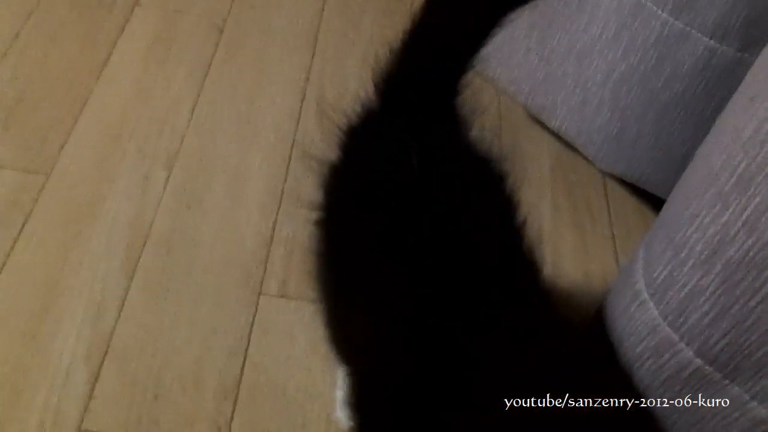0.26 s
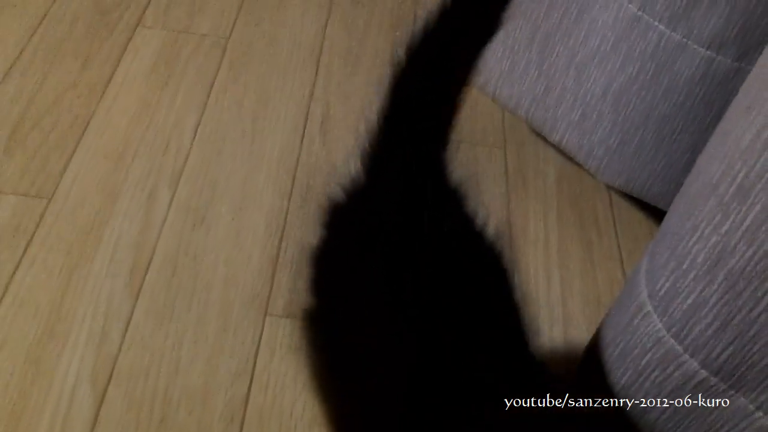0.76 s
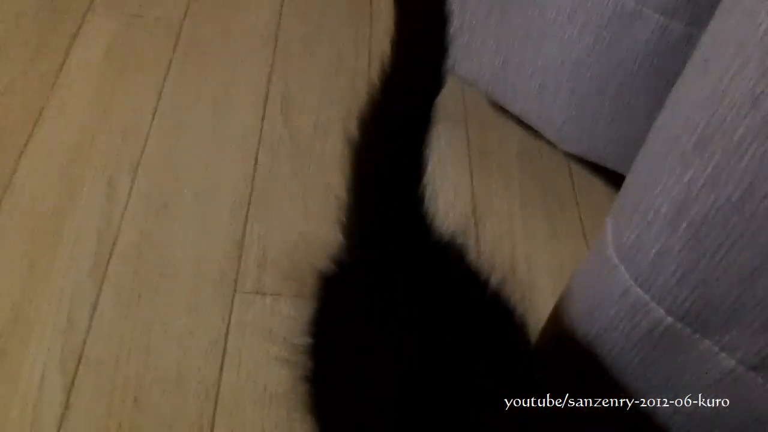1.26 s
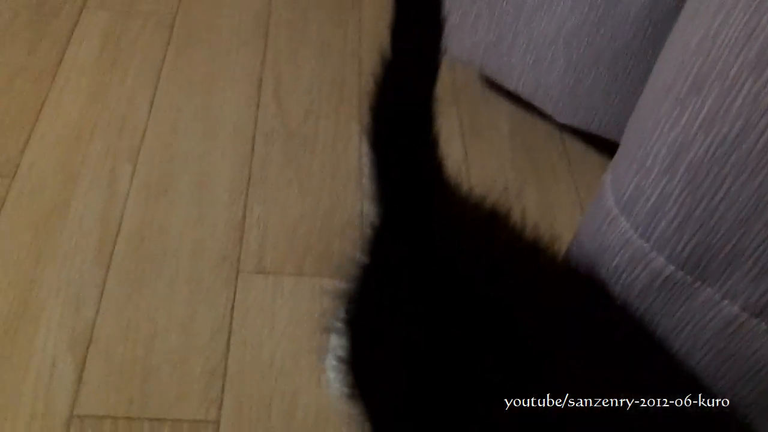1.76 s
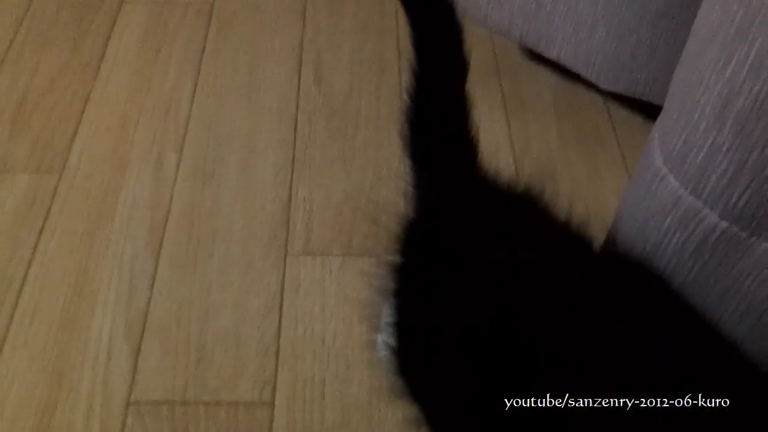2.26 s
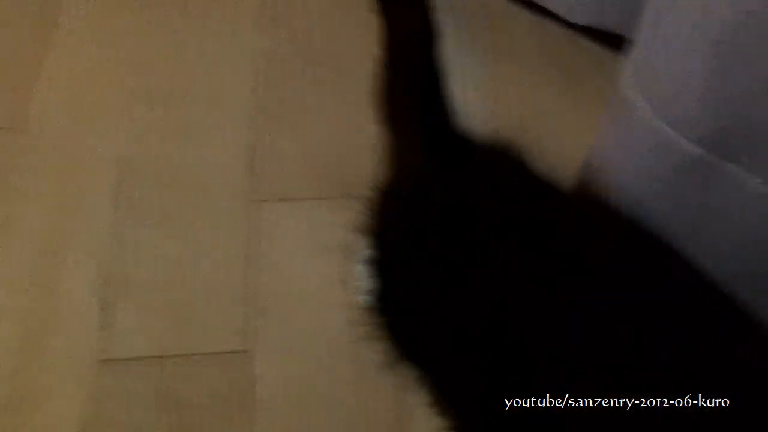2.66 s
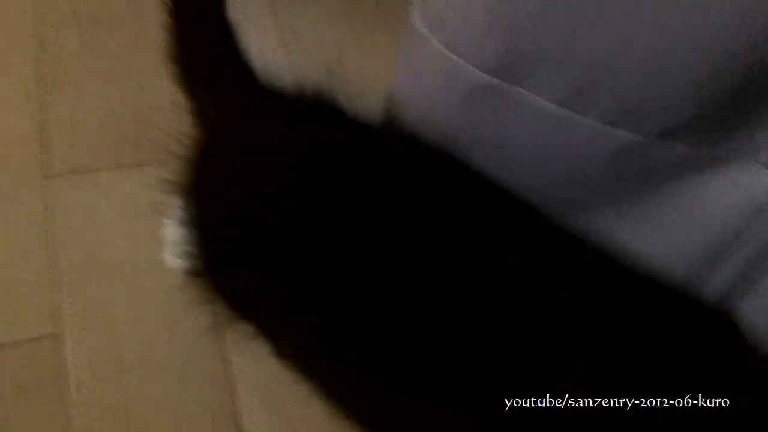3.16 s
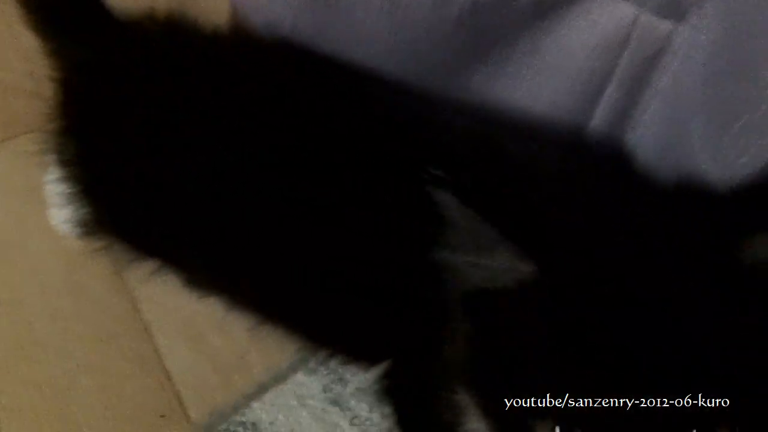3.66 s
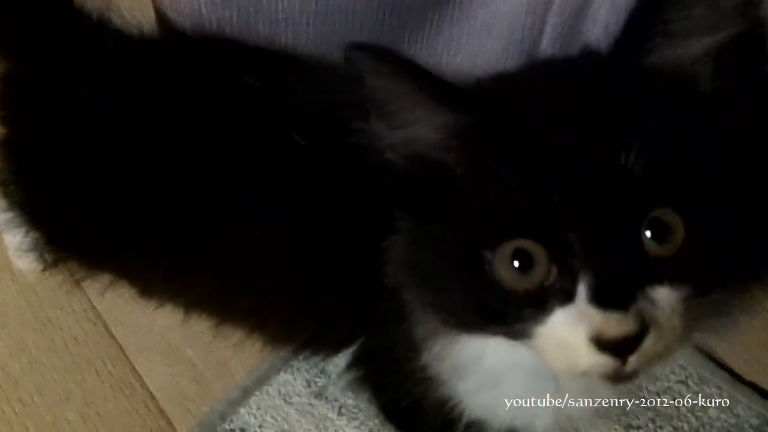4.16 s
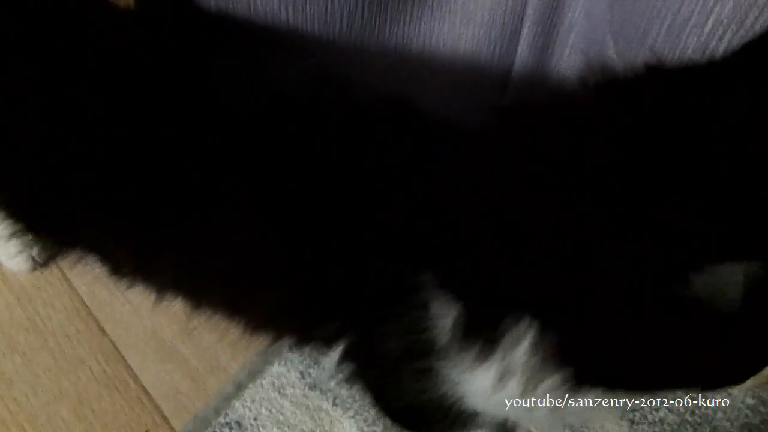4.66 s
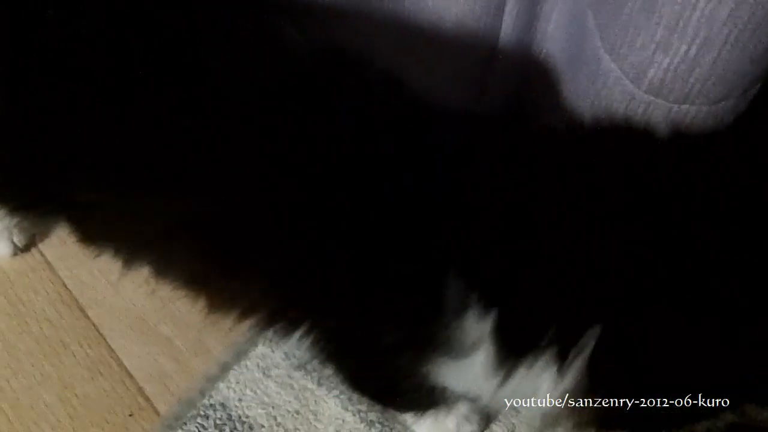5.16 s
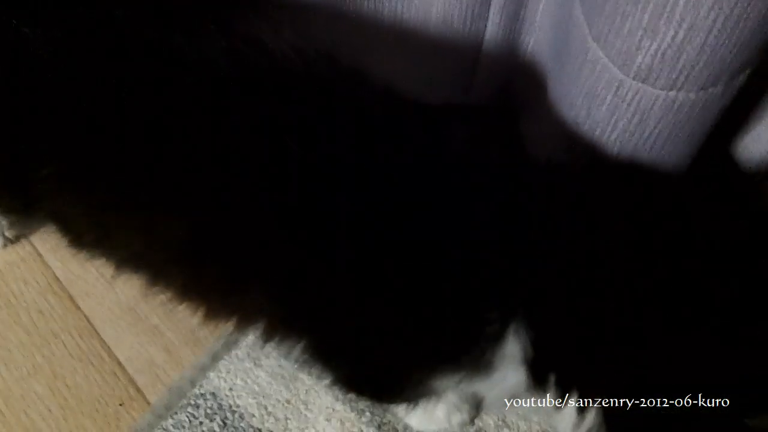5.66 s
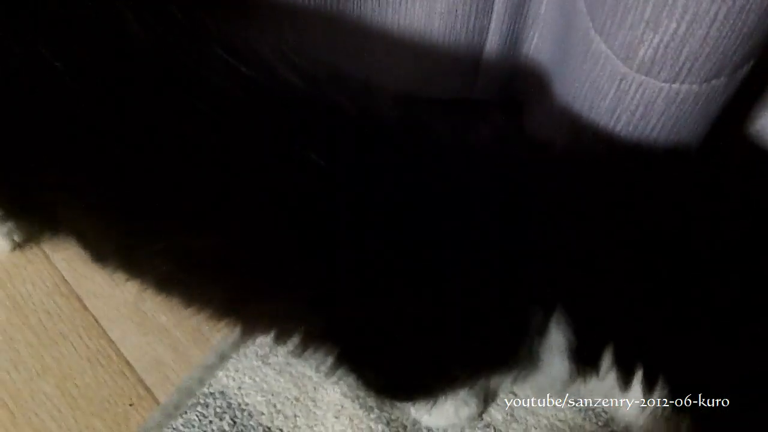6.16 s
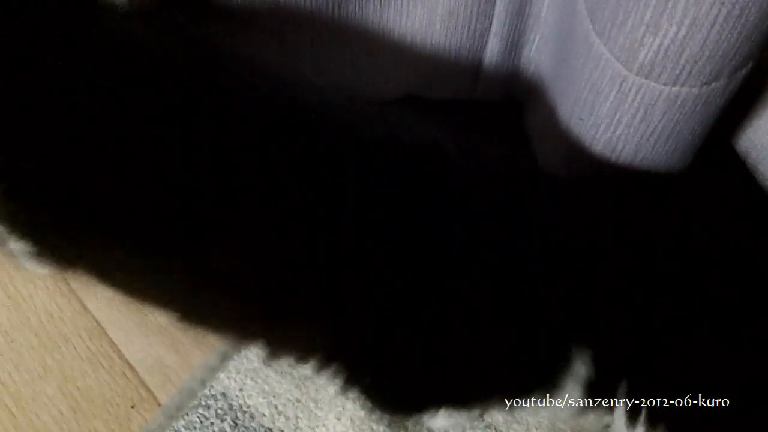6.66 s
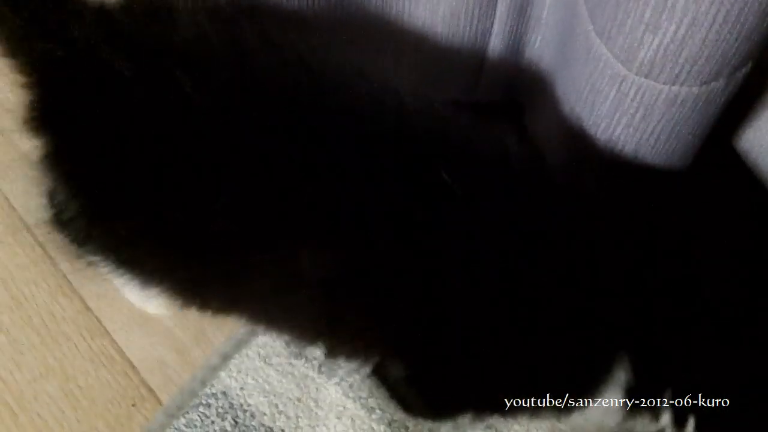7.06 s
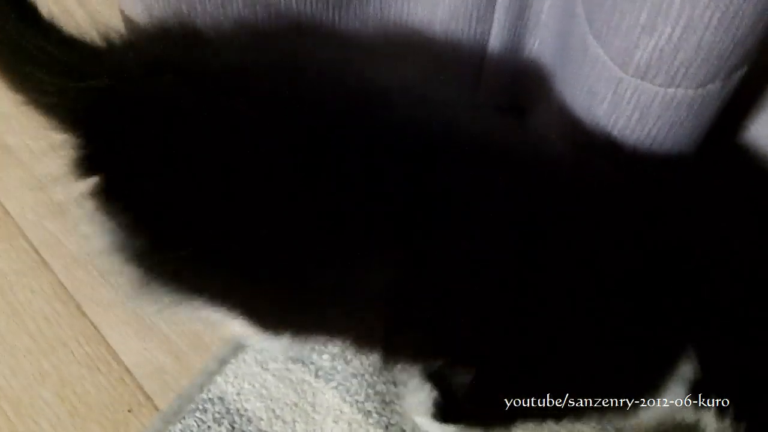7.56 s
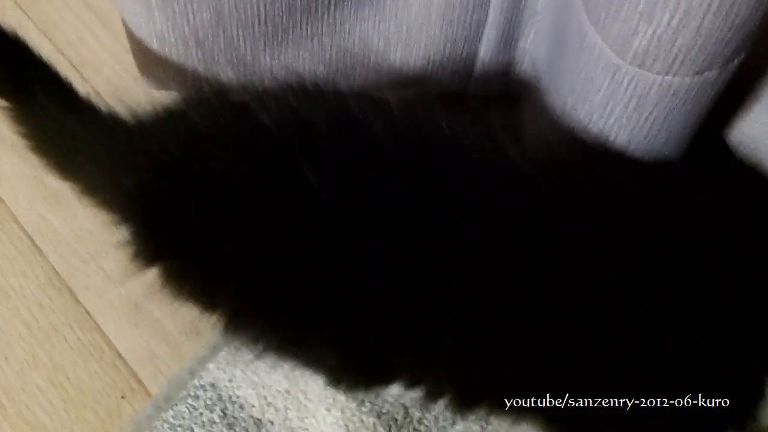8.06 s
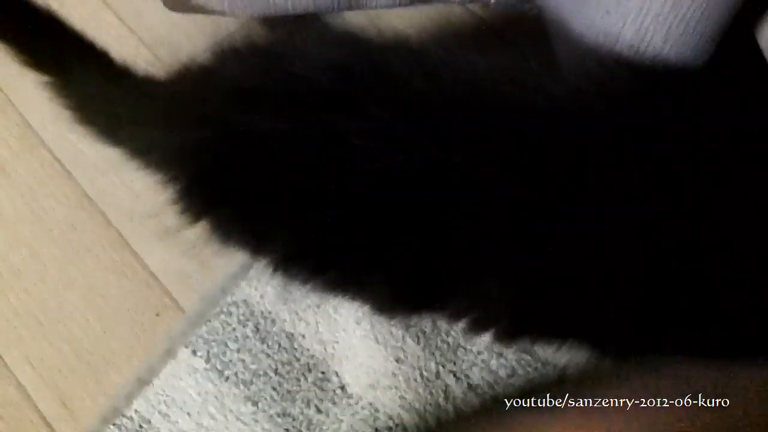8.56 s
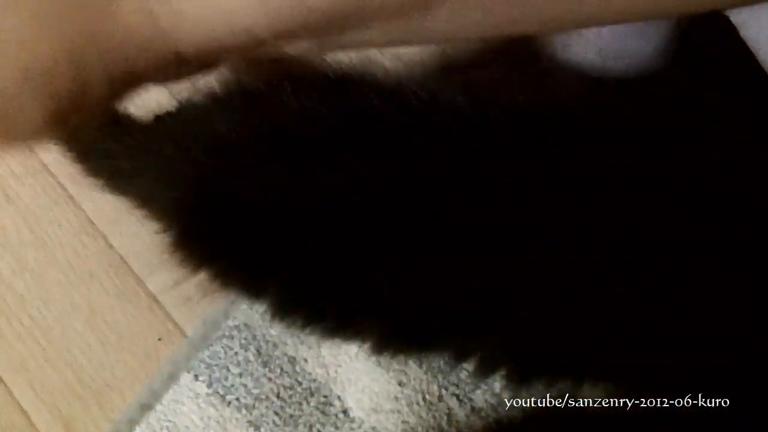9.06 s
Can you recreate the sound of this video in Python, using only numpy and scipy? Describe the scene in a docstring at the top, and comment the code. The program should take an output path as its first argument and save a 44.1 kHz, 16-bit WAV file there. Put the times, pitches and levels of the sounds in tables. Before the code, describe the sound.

Close, dry plastic clicks, short scrapes and dull handling bumps cluster then thin out over microphone hiss, low hum and very soft fur brushing.

```python
"""Over microphone hiss and a low wavering hum, fingers tick and slide on a plastic camera case and
the grip bumps it; fur rustles faintly on cloth and the holding hand rumbles. Ticks are blows with
chatter and slides are slipping noise, both rung through the case and its air pocket; bumps and two slow
low swings are smooth pulses with a hollow knock; fur, hum, hiss and rumble are filtered noise."""
import sys
import numpy as np
from scipy import signal
from scipy.fft import rfft, irfft, next_fast_len
from scipy.io import wavfile
from scipy.ndimage import map_coordinates

SR = 44100
rng = np.random.default_rng(int(sys.argv[2]) if len(sys.argv) > 2 else 0)


def store_wav(level_fs):
    """Save 16-bit WAV to argv[1]."""
    pcm = np.round(np.clip(np.atleast_2d(level_fs), -1, 1) * 32767)
    wavfile.write(sys.argv[1], SR, pcm.T.astype(np.int16))


N = 410130

# ticks of the case: t/s (blow 0.7 ms later), nominal cavity peak/dB, walls re cavity/dB
TICK_ROWS = [(.3486, -20.5, -23), (1.4336, -33, -24), (1.6467, -33, -19), (1.66, -39, -19),
             (1.6751, -39, -21), (1.8106, -24.5, -17), (1.8982, -27.5, -8.5), (1.9128, -29, -22),
             (1.94, -29, -21), (1.9545, -25, -29), (2.0183, -20, -23), (2.153, -36, -16),
             (2.2014, -33, -24), (2.273, -24.5, -21), (2.607, -0.5, -24), (2.6156, -25, -6.5),
             (2.885, -35, -16), (2.9898, -29, -26), (3.0627, -3, -24), (3.076, -17, -27),
             (3.1562, -4.5, -24), (3.2085, -23, -14), (3.2496, -26, -7), (3.2674, -22.5, -27),
             (3.2836, -21, -19), (3.3022, -15, -33), (3.3199, -16, -19.5), (3.3347, -19, -25),
             (3.351, -21, -19.5), (3.3632, -17, -23), (3.3763, -19, -21), (3.3885, -22, -13.5),
             (3.6451, -13, -23), (3.65, -15, -30), (3.7618, -22, -13), (4.342, -33.5, -2.5),
             (4.9552, -40.5, -2), (5.338, -37, -5), (5.5008, -16, -14.5), (5.5077, -8.5, -31),
             (5.9049, -30.5, -24), (6.0464, -40, -16), (6.2203, -30.5, -20), (7.2093, 2, -29.5),
             (7.7817, -40, -12), (7.9127, -34, -16), (7.9693, -29, -4.5), (8.0786, -30, -6),
             (8.397, -30, -16), (8.4222, -20, -12), (8.4277, -12, -17), (8.4588, -22, -7)]


def amp(db):
    """Decibels to gain."""
    return 10 ** (np.asarray(db) / 20)


def unit(x):
    """Scaled to rms 1."""
    return x / np.sqrt(np.mean(x ** 2) + 1e-20)


def curve(rows):
    """One value per sample from (t/s, value) rows."""
    return np.interp(np.arange(N) / SR, *np.transpose(rows))


def wobble(knots_per_s):
    """A smooth curve through random knots."""
    knots = rng.standard_normal(int(N * knots_per_s / SR) + 4)
    return map_coordinates(knots, [np.arange(N) * knots_per_s / SR])


def filtered(x, response):
    """x times a complex response of frequency, zero-padded by at least half a second."""
    m = next_fast_len(N + SR // 2)
    spectrum = rfft(x, m) * response(np.fft.rfftfreq(m, 1 / SR))
    return irfft(spectrum, m)[..., :N]


def ringing(x, modes, order=1):
    """Causal resonances of alternating sign, raised to order (gains too); white noise keeps its rms."""
    def shape(f):
        total = 0
        for k, (centre, width, db) in enumerate(modes):
            resonance = 1j * f * width / (centre ** 2 - f * f + 1j * f * width)
            total = total + (-1) ** k * amp(db) * resonance
        return total ** order

    power = np.mean(np.abs(shape(np.arange(1, SR // 2))) ** 2)
    return filtered(x, shape) / np.sqrt(power)


def soft(x, edge_hz):
    """Soft skin passes little above the edge: two one-pole low-passes."""
    return filtered(x, lambda f: 1 / (1 + 1j * f / edge_hz) ** 2)


def swell(start_s, rise_s, hold_s, fall_s):
    """A smooth rise, a plateau and a smooth fall: (first sample, shape)."""
    t = np.arange(round((rise_s + hold_s + fall_s) * SR) + 2) / SR
    edge = np.clip(np.minimum(t / (rise_s + 1e-4), (t[-1] - t) / (fall_s + 1e-4)), 0, 1)
    return round(start_s * SR), np.sin(np.pi / 2 * edge) ** 2


def hiss():
    """Nearly steady room air and microphone noise: white noise given a spectral colour."""
    # f/Hz, relative density/dB
    hiss_colour = [(20, -9.5), (45, -8.5), (83, -24.5), (170, -16), (310, -15), (1150, -16.5),
                   (2600, -17.5), (6000, -25), (9300, -26.5), (15400, -27.5)]
    level_db = -46
    f_hz, density_db = np.transpose(hiss_colour)

    def colour(hz):
        return amp(np.interp(np.log(hz + 1), np.log(f_hz), density_db))

    noise = unit(filtered(rng.standard_normal(N), colour))
    return amp(level_db + 0.18 * wobble(10)) * noise


def hum():
    """A low hum that wavers in strength: narrow-band noise with its envelope evened out."""
    # t/s, level/dB before a 1 dB lift and the wobble
    hum_level = [(0, -50), (.75, -49.5), (1.5, -50), (2.1, -55.5), (2.9, -48), (3.3, -51), (3.8, -46.5),
                 (4, -54.5), (4.55, -44.5), (5.55, -47.5), (5.9, -52), (6.5, -52), (7.1, -47.5),
                 (7.9, -52.5), (8.3, -48), (8.6, -53), (9.1, -53), (9.3, -54)]
    # f/Hz, width/Hz, gain/dB
    hum_band = [(35.4, 5.1, 0)]
    tone = ringing(rng.standard_normal(N), hum_band)
    envelope = np.abs(signal.hilbert(tone))
    steady = tone / (envelope + 0.44 * np.std(tone))  # the offset keeps the deepest dips
    return amp(curve(hum_level) + 1 + 2 * wobble(4)) * unit(steady)


def rumble():
    """The holding hand trembles through the case: low-bass noise of uneven strength."""
    # t/s, level/dB before the wobble
    rumble_level = [(0, -62), (.3, -54.5), (1.5, -68), (1.8, -55.5), (2.9, -57), (3.73, -45.5),
                    (3.95, -57.5), (4.9, -67), (5.36, -58), (5.7, -60.5), (6.3, -55.5), (7.7, -63),
                    (8.3, -51), (8.6, -62), (9, -55), (9.3, -61.5)]
    # f/Hz, width/Hz at order 1, gain/dB
    rumble_band = [(79.6, 75, 0)]
    noise = ringing(rng.standard_normal(N), rumble_band, order=2)
    return amp(curve(rumble_level) + 0.98 * wobble(11)) * noise


def fur():
    """Fur brushes cloth nearby: soft band noise in uneven puffs."""
    # t/s, level/dB
    fur_level = [(0, -79), (.6, -61), (1.4, -63), (2.1, -55), (2.6, -58), (4, -54.5), (4.5, -59),
                 (5.5, -63), (5.75, -54), (6.05, -60), (6.35, -52.5), (6.8, -53.5), (7.3, -58), (7.75, -53),
                 (8.2, -58.5), (8.55, -51.5), (9.3, -57)]
    # f/Hz, width/Hz at order 1, gain/dB
    fur_band = [(1835, 960, 0)]
    puffs = unit(amp(3 * wobble(18) + 3.5 * wobble(200)))
    return amp(curve(fur_level)) * puffs * ringing(rng.standard_normal(N), fur_band, order=2)


def camera_case(drive):
    """Four drives (cavity, walls, shoulders, shell) each sound through their own resonances."""
    # air pocket at the microphone: f/Hz, width/Hz at order 1, gain/dB before squaring
    cavity_modes = [(2858, 966, 7), (3714, 1235, 6.5)]
    # case walls: f/Hz, width/Hz, gain/dB
    wall_modes = [(462, 1030, -6), (877, 123, 5.5), (1460, 330, -3)]
    # broad modes beside the air pocket: f/Hz, width/Hz at order 1, gain/dB before squaring
    shoulder_modes = [(2010, 1000, 3.5), (4440, 3100, -1.5)]
    # thin shell, the fizz: f/Hz, width/Hz at order 1, gain/dB before squaring
    shell_modes = [(6960, 4800, 6), (11630, 1100, 4.5)]
    cavity = ringing(drive[0], cavity_modes, order=2)
    walls = ringing(soft(drive[1], 3700), wall_modes)
    shoulders = ringing(drive[2], shoulder_modes, order=2)
    shell = ringing(drive[3], shell_modes, order=2)
    return cavity + walls + shoulders + shell


def ticks():
    """Each tick is a sharp blow followed by chatter; harder blows are cleaner and mostly shorter."""
    drive, t = np.zeros((4, N + SR)), np.arange(SR // 40) / SR
    narrow_db = np.array([11.06, 18.3, 20.2, 19])  # a narrower path needs a harder blow for the same peak
    for s, db, walls_db in TICK_ROWS:
        over_db = db + 20
        t60_s = 0.004 - 0.00032 * min(db, 0)
        chatter_db = -13 - 0.28 * over_db
        strike = amp(chatter_db - 60 * t / t60_s) * rng.standard_normal((4, len(t)))
        strike[:, 0] = [1.01, 0.95, 1.24, 1.64]  # the blow itself
        shoulders_db = -11 + 0.36 * walls_db
        fizz_db = -38.5 + 0.38 * over_db  # harder blows are brighter
        paths_db = np.array([0, walls_db, shoulders_db, fizz_db])  # re cavity
        gains = amp(db + narrow_db + paths_db)[:, None]
        i = round((s + 0.0007) * SR)
        drive[:, i:i + len(t)] += gains * strike
    return camera_case(drive[:, :N])


def slides():
    """Skin drags in countless tiny slips: noise whose strength varies within milliseconds."""
    # t/s and length/s at half height, cavity level/dB, walls and shoulders re cavity/dB
    slide_rows = [(1.105, .08, -55, -10, 7.5), (1.428, 0.027, -40.5, -18, -4), (1.623, 0.033, -46, -4, -9),
                  (1.9, 0.035, -47, -14, -5), (1.959, 0.084, -33, -18, -12), (2.203, .122, -43, -13, -6),
                  (2.346, 0.075, -42, -14, -11), (2.439, 0.069, -39, -14, -11), (2.575, 0.052, -42, -9, -6),
                  (2.611, 0.1, -45, -8, -7), (2.763, 0.11, -31, -14.5, -3.5), (2.897, 0.06, -35, -18, -9),
                  (2.982, 0.023, -37, -20, -12), (3.045, .022, -42, -14, -9),
                  (3.068, 0.037, -33, -16, -6.5), (3.122, 0.048, -40, -13, -9),
                  (3.156, 0.044, -38.5, -16, -12), (3.262, 0.15, -39, -7, -5.5),
                  (3.399, 0.078, -33.5, -15.5, -11), (3.472, 0.078, -26.5, -18, -11.5),
                  (3.611, 0.051, -31, -10, -15), (3.643, 0.019, -21.5, -21, -15),
                  (3.657, 0.017, -25.5, -24, -14), (3.685, 0.044, -32.5, -15, -18),
                  (3.763, 0.057, -25.5, -13.5, -15), (3.801, 0.061, -24, -14, -14),
                  (3.881, 0.052, -33.5, -17, -6), (3.994, .048, -46.5, -7, -8),
                  (4.113, 0.054, -43, -20, -8), (4.177, .06, -41, -15, -8), (4.287, 0.046, -37, -20, -6),
                  (4.35, .04, -49, -12, -9), (4.454, .042, -50, -12, -8), (4.98, 0.058, -48, -9, -9),
                  (5.052, 0.041, -45.5, -14, -12), (5.218, 0.067, -43.5, -14, -5),
                  (5.341, 0.034, -44.5, -11, -6), (5.51, 0.014, -40, -16, -9),
                  (7.212, .032, -41.5, -12, -15), (7.97, 0.053, -45, -4, -9),
                  (8.099, 0.045, -42.5, -13, -7), (8.245, .076, -47.5, -7, -17),
                  (8.388, .03, -27, -19, -24), (8.42, 0.048, -35, 0, -15), (8.457, .029, -34.5, -19, -16),
                  (8.5, 0.06, -53, 4, 7), (8.841, 0.14, -50, -7, 0.5)]
    rise_share, fall_share = 0.73, 0.77  # edges re length
    jerk_rise_s, jerk_near_s = 0.006, 0.01  # a slide this near a tick has this rise
    pressure, tick_s = np.zeros((4, N + SR)), np.transpose(TICK_ROWS)[0]
    for s, length_s, db, walls_db, shoulders_db in slide_rows:
        jerked = np.abs(tick_s - s).min() < jerk_near_s
        rise_s = jerk_rise_s if jerked else rise_share * length_s
        fall_s = fall_share * length_s
        hold_s = length_s - (rise_s + fall_s) / 2
        i, shape = swell(s - rise_s / 2, rise_s, hold_s, fall_s)
        fizz_db = -16 + 0.38 * shoulders_db
        paths_db = np.array([0, walls_db, shoulders_db, fizz_db])  # re cavity
        pressure[:, i:i + len(shape)] += amp(db + paths_db)[:, None] * shape
    slips = unit(amp(1.14 * wobble(400) + 1.6 * wobble(60)))
    return camera_case(pressure[:, :N] * slips * rng.standard_normal((4, N)))


def bumps():
    """Short jolts of the grip, and two slow low swings of the hum near 8.5 s, through a bass cut."""
    # t/s, pulse peak/dB before the bass cut, length/ms, direction (+1 or -1),
    # hollow knock re pulse/dB before a 19 dB lift
    bump_rows = [(2.605, -26, 11.3, 1, -30), (2.884, -27.5, 2.6, -1, -7), (3.061, -35, 4.6, 1, -30),
                 (3.074, -33, 12, -1, -30), (3.155, -33, 5.2, 1, -30), (3.578, -32, 12, -1, -30),
                 (3.638, -19.5, 3.8, -1, -26), (3.76, -18, 3.1, -1, -25), (3.81, -25, 19, 1, -1),
                 (4.343, -33, 3.1, 1, -22), (4.952, -30.5, 9.4, -1, -30), (5.498, -24.5, 5.8, -1, -28),
                 (5.512, -29, 14, -1, -30), (5.905, -37, 3.5, 1, -30), (7.209, -18.5, 2.7, -1, -34),
                 (7.213, -34, 15, 1, -30), (7.912, -32.5, 16, 1, -30), (8.081, -31, 6.7, -1, -22),
                 (8.235, -26, 3.9, -1, -20), (8.38, -29, 20, -1, -30), (8.414, -25, 16, 1, -4),
                 (8.427, -17, 2.76, 1, -5), (8.452, -25, 9, -1, -20), (8.479, -25, 33, -1, -40),
                 (8.503, -27, 38, 1, -40)]
    # hollow body of the camera: f/Hz, width/Hz, gain/dB
    hollow_modes = [(292, 96, 0)]
    rise_share, bass_hz = 0.64, 22
    pulses, knock = np.zeros((2, N + SR))
    for s, db, length_ms, way, ring_db in bump_rows:
        length_s = length_ms / 1000
        i, shape = swell(s, rise_share * length_s, 0, (1 - rise_share) * length_s)
        pulses[i:i + len(shape)] += way * amp(db) * shape
        knock[i] += way * amp(db + ring_db + 19)  # the onset excites the hollow body

    def bass_cut(f):
        return -f * f / (bass_hz ** 2 - f * f + 1.7j * f * bass_hz)

    return filtered(pulses[:N], bass_cut) + ringing(soft(knock[:N], 590), hollow_modes)


def scene():
    """Everything reaches one microphone."""
    return (hiss() + hum() + rumble() + fur() + ticks() + slides() + bumps())[None]


def record(dry):
    """Two dips in the treble; the loudest peaks flatten at full scale; little passes the band limit."""
    # a deep dip near 8 kHz, a narrow one near 12 kHz: f/Hz, half width/Hz, depth (0-1)
    treble_dips = [(7860, 720, .97), (11750, 100, 0.6)]
    limit_hz = 15500

    def dipped(hz):
        return np.prod([1 - depth / (1 + ((hz - f) / w) ** 2) for f, w, depth in treble_dips], axis=0)

    heard = filtered(dry, dipped)
    clipped = heard / (1 + np.abs(heard) ** 24) ** (1 / 24)
    return filtered(clipped, lambda hz: 1 / (1 + (hz / limit_hz) ** 160))


dry = scene()
out = record(dry)
store_wav(out)
```